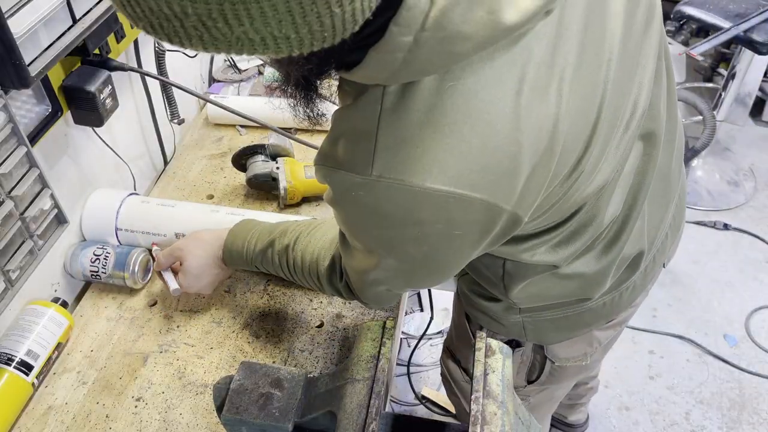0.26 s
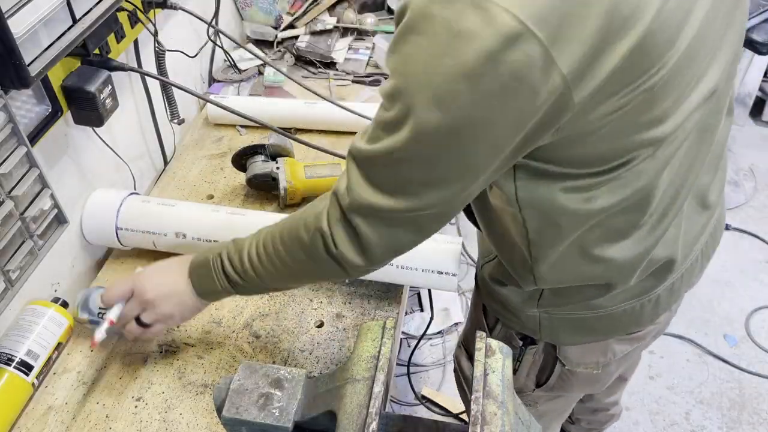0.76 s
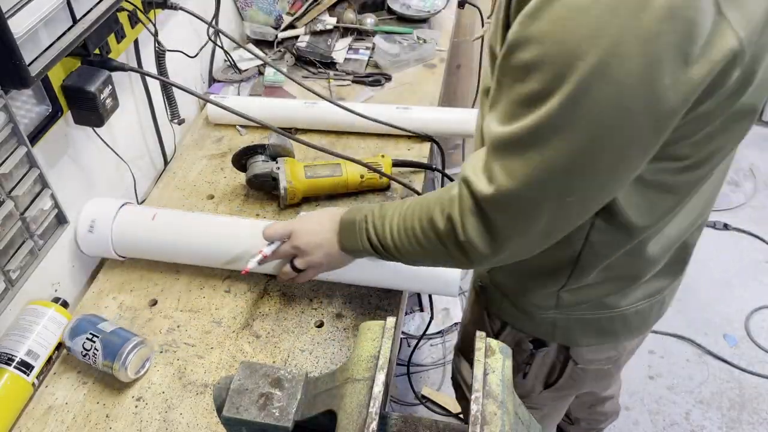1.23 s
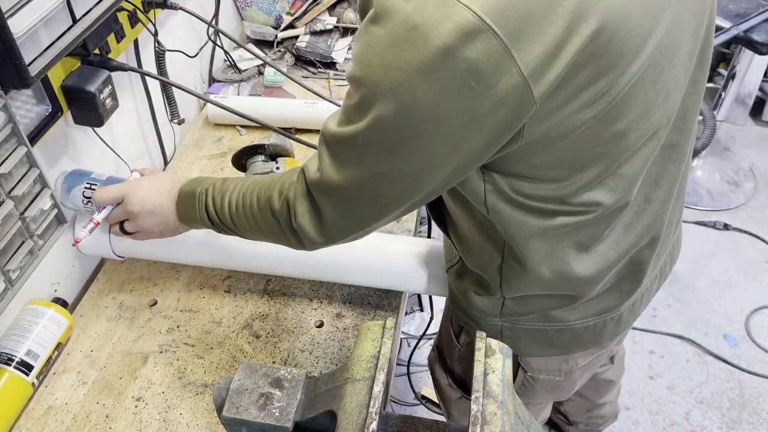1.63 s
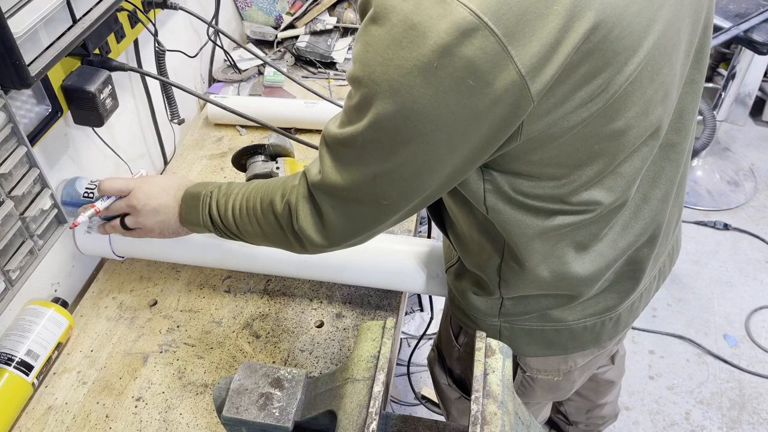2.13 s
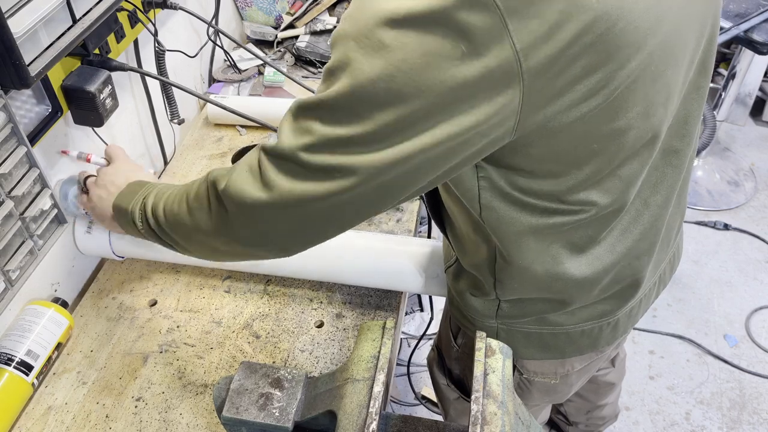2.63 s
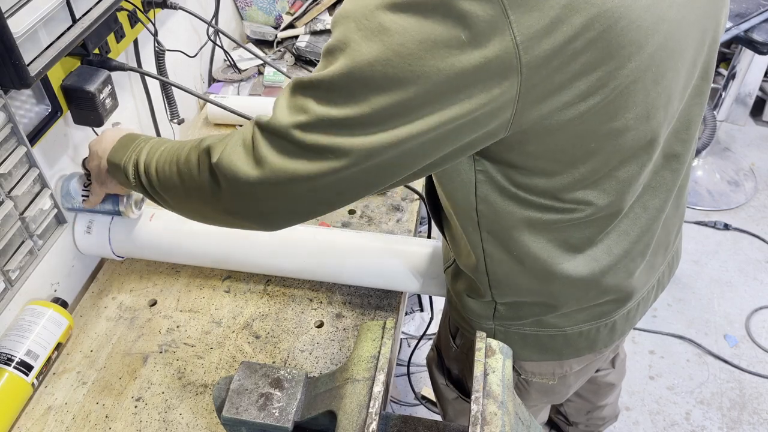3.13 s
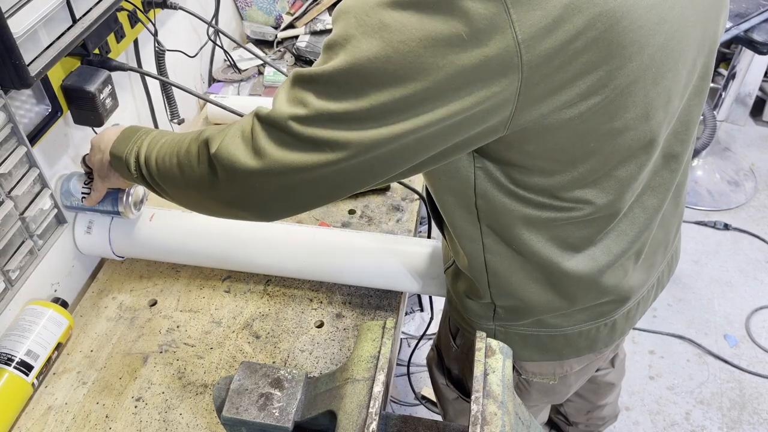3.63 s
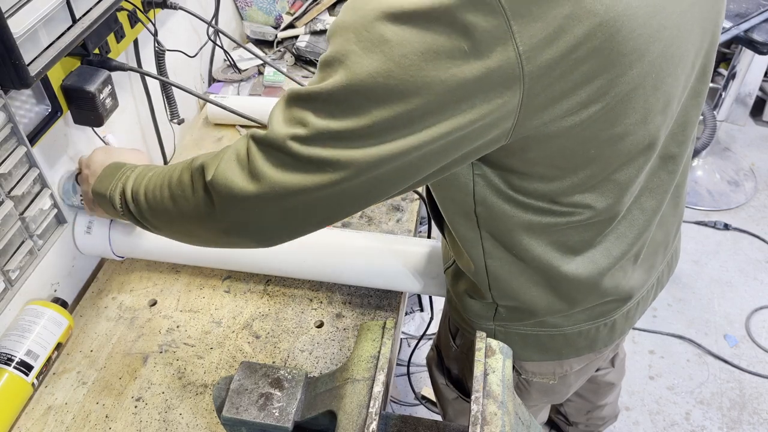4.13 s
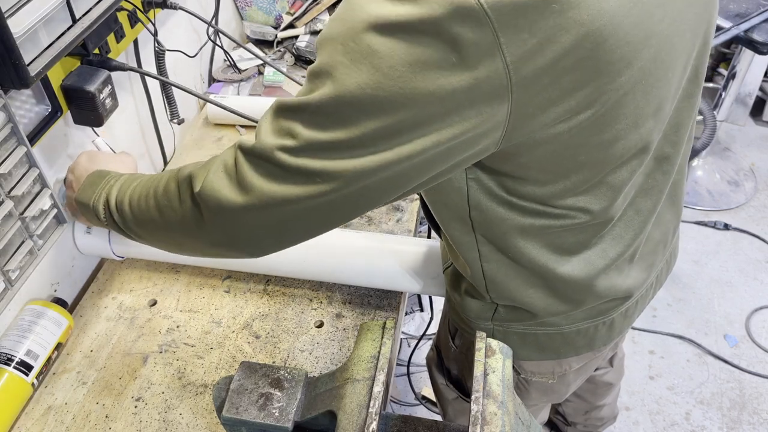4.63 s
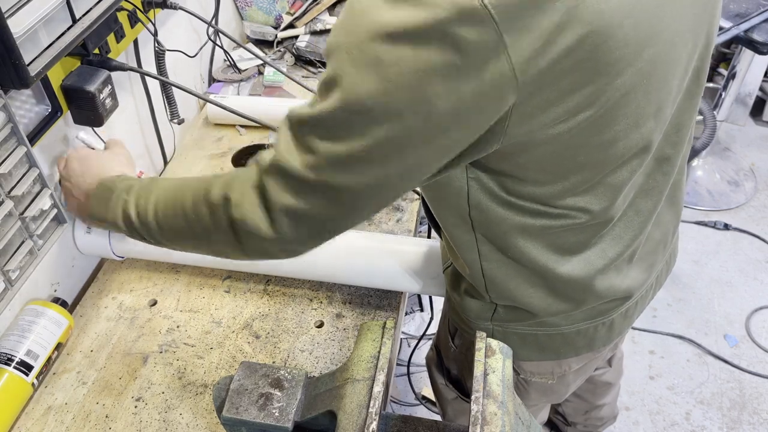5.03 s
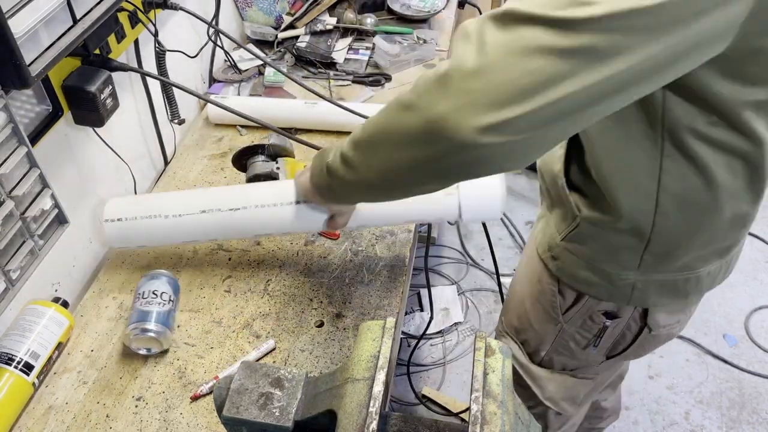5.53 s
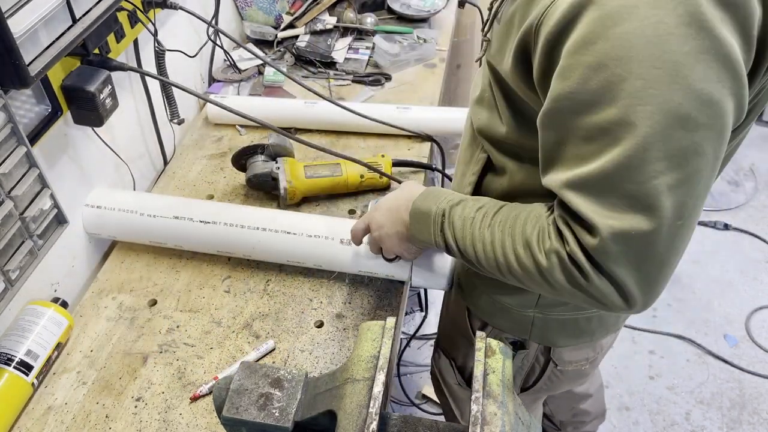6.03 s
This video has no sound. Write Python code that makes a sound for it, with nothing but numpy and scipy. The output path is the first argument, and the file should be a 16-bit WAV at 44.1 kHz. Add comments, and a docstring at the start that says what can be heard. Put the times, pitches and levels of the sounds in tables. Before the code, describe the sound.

A steady low mains hum in a dull rumble lies under the whole scene, in a small cluttered garage heard closely in stereo. From 0 to 0.7 s there are only faint hand scuffs and a light tick. At 0.8 s a drink can clacks sharply on the wooden bench; between 1.0 and 1.3 s a hollow plastic pipe bumps, rocks and slides with soft low thumps. From 1.5 to 3.1 s a marker and the can rub the pipe in short, uneven dry scrapes, with a firm knock at 1.6, a stronger squeaky rub around 2.2 and scratchy ticks. A crisp tick comes at 3.5 s, then sparse, weakening scuffs until 5. At 5.14 s a bright double can clack sets off ringing pipe chatter and skids. Dull landings follow at 5.6 s, small ticks after, and a low thump at 6.0 s, ending in faint rubbing.

```python
"""First a low mains hum in a dull rumble, with faint scuffs of a hand at work in a garage.
A plastic pipe and a drink can are shifted about on a wooden workbench: two sharp clacks of the can,
thumps, slides and chatter of the pipe, ticks and scuffs of a marker against it. Blows set off dying
sine waves; rubs are bursts of filtered noise in which single wall modes sometimes sing.
Noise echoes add a small cluttered room."""
import sys
import numpy as np
from scipy import signal
from scipy.fft import rfft, irfft, next_fast_len
from scipy.io import wavfile

SR = 44100
rng = np.random.default_rng(int(sys.argv[2]) if len(sys.argv) > 2 else 0)


def unload_wav(signal):
    """Save mono or channel-first audio to the path in sys.argv[1] as 16-bit WAV at rate SR, clipped to [-1, 1]."""
    wavfile.write(
        sys.argv[1],
        SR,
        np.round(np.clip(np.atleast_2d(signal).T, -1, 1) * 32767).astype(np.int16),
    )


N = 276066   # length in samples


def from_db(db):
    """Turns decibels into gain."""
    return 10 ** (np.asarray(db) / 20)


def at_hz(points, hz, axis=1):
    """Reads one column of a table on a log-frequency axis."""
    table = np.array(points)
    return np.interp(np.log(hz + 1e-9), np.log(table[:, 0]), table[:, axis])


def bins(size):
    """Frequencies in Hz of a real Fourier transform."""
    return np.arange(size // 2 + 1) * SR / size


def colour(x, *spectra):
    """Filters by the summed dB spectra, with no sound ahead of its cause (minimum phase)."""
    size = next_fast_len(x.shape[-1] + 2048, True) // 2 * 2
    total_db = sum(at_hz(spectrum, bins(size)) for spectrum in spectra)
    cepstrum = irfft(np.log(from_db(total_db)))
    # folding the cepstrum onto positive times gives the minimum phase
    cepstrum[1:size // 2] *= 2
    cepstrum[size // 2 + 1:] = 0
    response = np.exp(rfft(cepstrum))
    return irfft(rfft(x, size) * response)[..., :x.shape[-1]]


def lowpass(x, order, floor_db, top_hz):
    """Cuts steeply above top_hz, down to a floor."""
    return signal.sosfilt(signal.ellip(order, .2, floor_db, top_hz, fs=SR, output="sos"), x)


def add(track, s, sound):
    """Mixes a sound into a track at time s."""
    start = int(s * SR)
    part = track[..., start:start + sound.shape[-1]]
    part += sound[..., :part.shape[-1]]


def wobble(size, step_s, db):
    """A gain that glides to a new random value every step_s; rms 1."""
    targets = np.clip(rng.standard_normal(size), -2, 2)
    gain = from_db(db * np.interp(np.arange(size) / SR / step_s, np.arange(size), targets))
    return gain / np.sqrt(np.mean(gain ** 2))


def ring(modes, ratio=1, turn=1, longest_s=0.062):
    """A struck body's decaying sines, damped by the hand; negative turn flips every other mode."""
    t = np.arange(SR // 4) / SR
    body = np.zeros(len(t))
    for k, (hz, db, t60) in enumerate(modes):
        decay = from_db(db - 60 * t / min(t60, longest_s))
        body += turn ** k * decay * np.sin(2 * np.pi * hz * ratio * t)
    return body


def with_crack(body, crack_db, crack_s):
    """Adds the short noise of a hard contact to a ringing body."""
    fade = np.exp(-np.arange(len(body)) / SR / crack_s)
    return body + from_db(crack_db) * rng.standard_normal(len(body)) * fade


def shaped(grains, envelope):
    """Puts grains under an envelope, with the energy that the envelope gives."""
    burst = grains * envelope
    return burst * np.sqrt(np.mean(envelope ** 2) / (np.mean(burst ** 2) + 1e-20))


def swell(u, rise=0.48, fall=0.44):
    """A rub grows and fades with the speed of the hand; u runs from 0 to 1 over the rub."""
    return np.sqrt(2) * np.exp(-((u - .5) / np.where(u < .5, rise, fall)) ** 2)


RUB_TOP_HZ = 10620


def cut_top(x):
    """Cuts the rubs and rattles steeply above RUB_TOP_HZ."""
    return lowpass(x, 6, 50, RUB_TOP_HZ)


# The bass of a rub rises more slowly than its level.
BASS_REFERENCE_DB, BASS_LOSS_DB_PER_DB = -50, 0.5253


def with_bass(rows, bass_db):
    """Gives each rub its bass by its level; bass_db holds for a rub at BASS_REFERENCE_DB."""
    out = []
    for s, length, db, *tone in rows:
        bass = bass_db - BASS_LOSS_DB_PER_DB * (db - BASS_REFERENCE_DB)
        out.append((s, length, db, bass, *tone))
    return out


# The centres of bass, middle and treble. A plain list of frequencies in Hz.
TONE_CENTRES_HZ = [403, 1700, 6140]
SPOT_WIDTH_OCTAVES = 0.38   # half width of the broad resonance of the spot that is touched


def friction(rows, spectrum, envelope, rings, grain_db, grain_s, place_db):
    """Bursts of tiny catches and slips, each with its own tone, ringing in the things that touch."""
    force, t = np.zeros((2, N)), np.arange(-SR // 25, SR // 5) / SR
    mode_hz = np.linspace(200, 12000, 110)
    for s, length, db, bass_db, treble_db, spot_hz, spot_db in rows:
        grains = rng.standard_normal((2, len(t))) * wobble(len(t), grain_s, grain_db)
        burst = shaped(grains, envelope(t / length))
        tone = list(zip(TONE_CENTRES_HZ, [bass_db, 0, treble_db]))
        # each point of contact favours other modes
        place = list(zip(mode_hz, place_db * rng.uniform(-2.156, 1, len(mode_hz))))
        reach = 2 ** SPOT_WIDTH_OCTAVES
        spot = [(spot_hz / reach, 0), (spot_hz, spot_db), (spot_hz * reach, 0)]
        add(force, s + t[0], from_db(db) * colour(burst, spectrum, tone, place, spot))
    out = force.copy()
    for hz, width, db in rings:
        resonance = signal.iirpeak(hz, hz / width, fs=SR)
        out += from_db(db) * signal.lfilter(*resonance, force + 1e-18)
    return out


# The tone of the dull rumble. Each row: frequency in Hz, relative strength in dB per Hz.
RUMBLE_TONE = [(22, -4), (35, 0.5), (55, -2.5), (85, -1.5), (130, 4), (175, -4), (220, 3), (300, -15.5),
               (420, -10), (560, -20.5), (800, -35.5), (1500, -43), (2600, -48), (3500, -46.5), (5000, -51),
               (9000, -48), (10600, -53), (11800, -70.5)]
# How the background sinks briefly and comes back. Each row: time in seconds, gain in dB.
BACKGROUND_DIP = [(0, -1.5), (5.25, -1.5), (5.36, -6.5), (5.49, -4.5), (5.62, 1), (5.9, -2)]
HUM_HZ = 60
HUM_DB, RUMBLE_DB = -49.5, -54.5   # before the gain of the dip


def background(waver_db=1.0):
    """Mains hum, a slightly wavering sine, in a dull rumble of filtered noise."""
    t = np.arange(N) / SR
    rumble = colour(rng.standard_normal((2, N)), RUMBLE_TONE)
    waver = wobble(N, step_s=0.065, db=waver_db)
    hum = from_db(HUM_DB) * np.sqrt(2) * np.sin(2 * np.pi * HUM_HZ * t) * waver
    dip = from_db(np.interp(t, *np.transpose(BACKGROUND_DIP)))
    return (hum * [[1], [0]] + from_db(RUMBLE_DB) * rumble / rumble.std()) * dip


def reflections(x, t60, delay_s):
    """A dense cloud of echoes that builds up over delay_s and dies away; unit energy."""
    t = np.arange(SR // 2) / SR
    build = 1 - np.exp(-(t / delay_s) ** 2)
    echoes = rng.standard_normal((2, len(t))) * from_db(-60 * t / t60) * build
    echoes /= np.sqrt(np.sum(echoes ** 2, axis=1, keepdims=True))
    return signal.fftconvolve(x[None], echoes, axes=1)[:, :N]


# How firmly the fingers shift their grip between strokes.
# Each row: time in seconds, middle level of the faint scuffs in dB before the level of all strokes.
GRIP_SHIFTS = [(0, -71), (.25, -85), (.5, -100), (1.4, -68.5), (1.9, -69), (2.25, -60), (2.5, -67),
               (3.15, -65.5), (3.78, -71), (3.95, -88), (4.25, -73.5), (4.5, -88), (4.85, -82)]
FIDGET_STEP_S, FIDGET_S = .07, 0.031   # typical spacing and length
FIDGET_SPREAD_DB, FIDGET_BASS_DB, FIDGET_TREBLE_DB = 4, 5.5, 4
FIDGET_SPOT_HZ = 3340


def fidgets(count=68):
    """Lists faint scuffs of uneven spacing, length and strength while the hand works."""
    when, length, strength, tone = rng.uniform(-1, 1, (count, 4)).T
    s = FIDGET_STEP_S * (np.arange(count) + 1.3 + .7 * when)
    span = FIDGET_S * 2 ** (length / 2)
    db = np.interp(s, *np.transpose(GRIP_SHIFTS)) + FIDGET_SPREAD_DB * strength
    treble = FIDGET_TREBLE_DB + FIDGET_SPREAD_DB * tone
    return [(*row, FIDGET_SPOT_HZ, 0) for row in zip(s, span, db, np.full(count, FIDGET_BASS_DB), treble)]


# Marker and can rub along the pipe. Each row: start in seconds, length in seconds, level in dB before
# the level of all strokes, treble in dB over level, resonance of the spot in Hz, its lift in dB.
PIPE_STROKES = [(.09, 0.015, -74.5, 9.5, 3400, 9), (.155, 0.021, -72, 14, 3400, 8),
                (.19, 0.033, -79, 13, 3400, 8), (.26, 0.043, -79, 6, 3400, 3),
                (.335, 0.02, -81.5, 9, 3400, 5), (.64, .035, -60.5, 7.5, 3400, -3.5),
                (1.526, 0.012, -42, 9, 2200, -6), (1.607, 0.02, -57.5, 13, 10200, 15),
                (1.719, 0.032, -47.5, -1, 970, 11), (1.848, 0.03, -42, 5, 1180, 8),
                (1.893, 0.051, -43.5, 8.5, 1960, 11), (2.051, 0.064, -51.5, -8, 870, 12),
                (2.131, 0.017, -43.5, 11, 2100, 9.5), (2.226, 0.056, -35.5, 2, 1490, 4.5),
                (2.302, 0.02, -45.5, -1, 1300, -4), (2.413, 0.023, -68.5, 15, 3400, 9.5),
                (2.442, 0.03, -67, 18, 3400, 13.5), (2.476, 0.016, -66, 13, 3480, 24),
                (2.538, 0.023, -68, 22.5, 10500, 3.5), (2.658, 0.022, -49, 15.5, 3730, 9),
                (2.725, 0.049, -64.5, 5, 3400, 8.5), (2.828, 0.035, -64, 3.5, 3400, 11),
                (2.885, 0.033, -72, 15.5, 3400, 5), (2.977, 0.02, -58, 7.5, 3400, 12),
                (3.022, 0.017, -36, 3.5, 1370, -4), (3.118, 0.033, -53.5, 9.5, 3400, 5),
                (3.165, 0.018, -49.5, 9.5, 1300, 1), (3.33, 0.03, -63.5, -4, 3400, 11),
                (3.588, 0.015, -71, 15, 3000, 5), (3.674, 0.035, -51, 9, 1100, 13),
                (3.732, 0.024, -58.5, 13.5, 2220, 12), (3.794, 0.015, -60, 11.5, 3620, 15),
                (3.858, 0.02, -44, 11, 3590, 0), (4.125, 0.039, -47.5, -0.5, 1100, 5),
                (4.238, 0.019, -65.5, 1, 3400, 2), (4.385, 0.034, -72.5, 4, 3400, 2),
                (4.64, 0.015, -69, -2, 1200, 3.5), (4.677, 0.018, -65, 13.5, 3400, -5),
                (4.785, .022, -60.5, 0, 3680, 9), (5.047, 0.04, -59.5, 8, 10000, 0.5)]
STROKE_BASS_DB = 12   # at BASS_REFERENCE_DB


def hand_strokes():
    """Lists the rubs along the pipe and the faint scuffs of the fingers."""
    return with_bass(PIPE_STROKES, STROKE_BASS_DB) + fidgets()


# What friction excites in pipe and bench. Each row: frequency in Hz, strength in dB per Hz.
FRICTION_TONE = [(100, -17), (250, 10), (500, 1.5), (1000, 4), (2100, -2.5), (2700, -9.5), (3500, -8.5),
                 (6400, -10), (7800, -11), (8800, -4), (10600, -3.5), (11200, -26), (12000, -37)]
# Resonances of the marker on the pipe. Each row: frequency in Hz, width in Hz, level in dB.
MARKER_RESONANCES = [(843, 270, -9), (1620, 83, 4.5), (2100, 55, 0.5), (3370, 410, 6.5), (4300, 87, -11)]


def strokes_on_pipe(strokes, level_db=-7.0):
    """Marker, can and fingers rub on the plastic: friction noise that rings in the marker."""
    rubs = friction(strokes, FRICTION_TONE, swell, MARKER_RESONANCES, grain_db=4.3, grain_s=.003, place_db=7)
    return cut_top(from_db(level_db) * rubs)


SCRATCH_HZ, SCRATCH_WIDTH_HZ, SCRATCH_SHIFT_OCTAVES = 3340, 700, 0.046   # band of the tip's hiss
SLIPS_PER_S, SLIP_S = 260, 0.0011   # the tip catches and lets go; SLIP_S is a slip's decay time constant


def scratching(strokes, level_db=-38, pressure=0.67, glide_db=-12):
    """The marker tip hisses in uneven slips; its band shifts by stroke, its level rises less than the rub's."""
    out, t = np.zeros((2, N)), np.arange(-SR // 25, SR // 5) / SR
    for s, length, db, *tone in strokes:
        hz = SCRATCH_HZ * 2 ** (SCRATCH_SHIFT_OCTAVES * rng.uniform(-1, 1))
        edges = [hz - SCRATCH_WIDTH_HZ / 2, hz + SCRATCH_WIDTH_HZ / 2]
        band = signal.butter(2, edges, "band", fs=SR, output="sos")
        slips = (rng.random(len(t)) < SLIPS_PER_S / SR) * rng.exponential(1, len(t))
        grip = from_db(glide_db) + signal.lfilter([1], [1, -np.exp(-1 / (SLIP_S * SR))], slips)
        scratch = signal.sosfilt(band, grip * rng.standard_normal((2, len(t))))
        add(out, s + t[0], from_db(level_db + pressure * db) * shaped(scratch, swell(t / length)))
    return out


# Small hard touches. Each row: start in seconds, level in dB before the level of all ticks,
# treble in dB over level, resonance of the spot in Hz, its lift in dB.
TOUCHES = [(0.622, -40.5, 10.5, 10000, -2), (1, -43, 11.5, 4970, -1), (1.143, -53, 11, 9200, -2.5),
           (1.15, -42.5, 24.5, 9900, -3), (1.5004, -44, 22, 6030, 1), (1.6162, -24.5, -10, 890, 7.5),
           (2.063, -57.5, 24, 4440, 5), (2.572, -53.5, 13, 3400, 6), (3.021, -38, 4, 380, 10),
           (3.232, -51.5, 3.5, 6000, -2), (3.4802, -31, 9.5, 3300, 7), (3.4845, -42, 9, 2500, 9),
           (3.871, -50, 10, 3600, 9), (4.192, -49, 11, 3480, 8), (5.6683, -32, 5.5, 2500, 1),
           (5.676, -37, -4, 10000, -1), (5.867, -37.5, 10.5, 2000, 13)]
# What a small hard touch excites. Each row: frequency in Hz, strength in dB per Hz.
TAP_TONE = [(100, -18), (250, 1), (500, -2.5), (1000, 2), (2100, -5.5), (3500, -12), (6400, -10),
            (8800, -7), (10800, -9), (12000, -27)]
TICK_T60_S, TICK_BASS_DB = 0.021, -2.5


def sudden(u):
    """Starts at once and falls by 60 dB while u runs from 0 to 1."""
    return (u >= 0) * np.exp(-np.log(1000) * np.abs(u))


def ticks(level_db=3):
    """A touch starts at once and dies quickly in one broad, damped resonance."""
    touches = [(s, TICK_T60_S, db, TICK_BASS_DB, *tone) for s, db, *tone in TOUCHES]
    broad = [(3593, 1900, 0.0)]   # Hz, width Hz, dB
    return from_db(level_db) * friction(touches, TAP_TONE, sudden, broad,
                                        grain_db=8.5, grain_s=0.00059, place_db=6.5)


# A catch sets one wall mode singing. Each row: start in seconds, frequency in Hz,
# level in dB before build-up and grip, time to fall by 60 dB in seconds (at most 0.2 is used).
SINGING_MODES = [(1.215, 1226, -37, 0.098), (1.23, 1960, -44, 0.11), (2.236, 2102, -28, 0.064),
                 (5.167, 2068, -28.5, 0.067), (5.170, 4520, -30, 0.078), (5.2, 933, -31, 0.27),
                 (5.168, 3400, -38.5, .08), (5.527, 2100, -36, 0.043), (6.025, 2163, -44.5, 0.049),
                 (6.174, 2135, -43, 0.071)]
SINGING_WANDER_HZ = 30.23   # scales how far the shifting grip pulls a singing mode about


def singing(build_s=0.0039):
    """Single modes build up under the rub and ring on unevenly while the hand damps them."""
    out, t = np.zeros(N), np.arange(SR // 3) / SR
    build = 1 - np.exp(-t / build_s)
    for s, hz, db, t60 in SINGING_MODES:
        grip = wobble(len(t), step_s=.008, db=4)
        wander_hz = SINGING_WANDER_HZ * (wobble(len(t), step_s=.003, db=4) - 1)
        phase = 2 * np.pi * np.cumsum(hz + wander_hz) / SR
        decay = from_db(db - 60 * t / min(t60, .2))
        add(out, s, decay * grip * build * np.sin(phase))
    return out * [[1], [0]]


# The pipe lands on the bench. Each row: start in seconds, strength in dB,
# contact cut-off in Hz (higher is harder), share of the bench in dB.
LANDINGS = [(1.047, -32.5, 820, -6), (1.076, -22.5, 1001, -4.5), (1.196, -26.5, 280, -11),
            (1.271, -27, 260, -2), (1.2818, -20.5, 330, 3), (3.878, -44, 705, -11),
            (5.143, -30.5, 299.4, -6.5), (5.2141, -31.5, 900, -22), (5.5992, -19.5, 370, -3),
            (5.649, -23, 330, 4), (5.669, -27, 438, -3), (5.876, -40, 800, -6), (6.004, -18, 230, -9.5)]
SKID_S, SKID_DB, SKID_DB_PER_OCTAVE = .025, -18, 10   # the harder the contact, the louder the skid
SKID_CONTACT_HZ = 400   # contact at which a skid has just SKID_DB
SKID_BASS_DB, SKID_TREBLE_DB = 10.5, -6.5


def skids():
    """Lists the short rub around each landing of the pipe."""
    rows = []
    for s, db, contact_hz, bench_db in LANDINGS:
        level = db + SKID_DB + SKID_DB_PER_OCTAVE * np.log2(contact_hz / SKID_CONTACT_HZ)
        rows.append((s - SKID_S / 2, SKID_S, level, SKID_BASS_DB, SKID_TREBLE_DB, contact_hz, 0))
    return rows


# The pipe slides on the bench. Each row: start in seconds, length in seconds, level in dB,
# treble in dB over level, resonance of the spot in Hz, its lift in dB.
PIPE_SLIDES = [(.737, 0.03, -52, 6.5, 3300, 5), (.772, 0.029, -45.5, 14.5, 3300, 6),
               (.82, 0.022, -34, 1, 3160, 5), (.85, .04, -62.5, 9.5, 1100, -2),
               (.94, 0.0095, -61.5, 12, 1800, -2), (1.005, 0.045, -42, -3, 3350, -1),
               (1.071, 0.026, -44, 4, 750, 5), (1.141, 0.028, -43.5, 8.5, 10000, 0),
               (1.185, 0.05, -41.5, -5, 800, 8), (1.207, 0.059, -41.5, -3, 1200, 1),
               (1.258, 0.03, -38.5, -0.5, 2100, 2), (1.29, 0.032, -56.5, -19, 1110, 5),
               (5.119, 0.018, -45.5, 11, 3400, 6), (5.158, 0.031, -35, -0.5, 3500, 12),
               (5.184, 0.028, -27.5, 3.5, 3200, 5), (5.211, 0.026, -28.5, -7.5, 476, 2),
               (5.228, 0.037, -33.5, -8, 1100, 3), (5.293, 0.06, -40, -5, 1320, 6.5),
               (5.52, 0.048, -45, 2, 1380, 1.5), (5.595, 0.026, -46.5, 3.5, 10000, 4.5),
               (5.636, .025, -45.5, -21, 930, 9.5), (5.665, 0.057, -50.5, -8, 1300, -2),
               (5.736, 0.015, -47.5, 4, 3400, 2.5), (5.853, 0.028, -47, 10.5, 9850, 3),
               (5.885, 0.045, -51, -3, 2100, 6), (6.024, 0.01, -47.5, -10, 800, 14),
               (6.06, 0.094, -68, -1, 700, 10), (6.15, 0.037, -53.5, -1, 763, 11.5)]
# Resonances of the pipe wall. Each row: frequency in Hz, width in Hz, level in dB.
WALL_RESONANCES = [(480, 78, -4.5), (1005, 70, -1), (1380, 50, -4.5), (1622, 140, -6.5), (2080, 74, 1.5),
                   (2900, 140, -8), (3400, 160, -3), (4480, 57, -10.5), (6150, 79, -4.5)]
SLIDE_BASS_DB = 10   # at BASS_REFERENCE_DB


def slides_on_bench():
    """The pipe slides and skids over the wood: friction noise that rings in its hollow wall."""
    rows = with_bass(PIPE_SLIDES, SLIDE_BASS_DB) + skids()
    return cut_top(friction(rows, FRICTION_TONE, swell, WALL_RESONANCES, grain_db=4.5, grain_s=.002, place_db=6.5))


# The pipe chatters against the bench as it is handled. Each row: start in seconds, strength in dB.
CHATTER = [(1.221, -48), (1.232, -52), (1.247, -51), (2.24, -47.5), (2.254, -55), (5.15, -34), (5.186, -32),
           (5.1909, -31.5), (5.2055, -35), (5.2143, -28), (5.221, -33), (5.227, -34), (6.027, -62),
           (6.124, -67.5), (6.165, -61)]


def rattles(spread_db=4.5, detune=0.061, longest_s=0.051, crack_db=-2, crack_s=0.0014):
    """Each hard contact strikes the hollow wall modes anew, and the grip detunes them."""
    out = np.zeros(N)
    for s, db in CHATTER:
        chance = rng.uniform(-1, 1, (len(WALL_RESONANCES), 2))
        modes = []
        for (hz, width, level), (shift, strength) in zip(WALL_RESONANCES, chance):
            t60 = np.log(1000) / (np.pi * width)   # a narrow resonance rings longer
            modes.append((hz * (1 + detune * shift), level + spread_db * strength, t60))
        body = ring(modes, turn=-1.004, longest_s=longest_s)
        add(out, s, from_db(db) * with_crack(body, crack_db, crack_s))
    return cut_top(out * [[1], [0]])


# The pipe rocks to and fro. Each row: start in seconds, strength of the first bump in dB.
ROCKING = [(1.016, -28.5), (1.123, -40.5), (1.232, -35.5), (5.711, -40)]
ROCK_STEP_S, ROCK_CHANGE_DB = 0.025, -0.5   # from one bump to the next
ROCK_CONTACT_HZ, ROCK_BENCH_DB = 238.4, 1.5
GRAZE_LEAD_S, GRAZE_DB = .0105, -17.5


def pipe_contacts(count=3):
    """Lists landings, the graze before each, and rocking as short runs of slowly weakening bumps."""
    grazes = [(s - GRAZE_LEAD_S, db + GRAZE_DB, contact_hz, bench_db) for s, db, contact_hz, bench_db in LANDINGS]
    bumps = [(s + k * ROCK_STEP_S, db + k * ROCK_CHANGE_DB, ROCK_CONTACT_HZ, ROCK_BENCH_DB)
             for s, db in ROCKING for k in range(count)]
    return list(LANDINGS) + grazes + bumps


# Modes of the bench top and of the pipe. Each row: frequency in Hz, level in dB,
# time to fall by 60 dB in seconds (the hand allows at most 0.062).
BENCH_MODES = [(86, -12, 0.11), (123.5, 4, 0.076), (142, -2, 0.1)]
PIPE_MODES = [(201, -4.5, 0.17), (241, 1.5, 0.062), (334, 1.5, 0.024), (474, -9, 0.037), (598, -1, 0.037),
              (842, -5, 0.07), (1250, -7.5, 0.15), (1946, -9, 0.09)]


def thumps(pipe_low_hz=150, bench_low_hz=60):
    """Soft contacts make pipe and bench top answer in their modes; neither radiates deep bass."""
    pipe = signal.sosfilt(signal.butter(3, pipe_low_hz, "high", fs=SR, output="sos"), ring(PIPE_MODES))
    bench = signal.sosfilt(signal.butter(2, bench_low_hz, "high", fs=SR, output="sos"), ring(BENCH_MODES))
    out = np.zeros(N)
    for s, db, contact_hz, bench_db in pipe_contacts():
        contact = signal.butter(2, contact_hz, fs=SR, output="sos")
        add(out, s, from_db(db) * signal.sosfilt(contact, pipe + from_db(bench_db) * bench))
    return out


# The can hits the bench and bounces. Each row: start in seconds, strength in dB, pitch ratio,
# part that is struck.
CAN_HITS = [(0.805, -5, 1, "side"), (0.8115, -22.5, 1.6, "side"), (5.141, -8.5, 1.02, "rim"),
            (5.1435, -4, 0.98, "rim")]
# Modes of the can on its side, and on its stiff rim with a thin ping. Each row: frequency in Hz
# before the pitch ratio, level in dB, time to fall by 60 dB in seconds (at most 0.04 is used).
CAN_SIDE_MODES = [(370.4, -21.5, 0.039), (640, -23, .03), (797, -15, 0.041), (953, -5.5, 0.022),
                  (1260, -11.5, .032), (1539, -20, .03), (1700, -17.5, 0.036), (2015, -19, 0.05),
                  (2420, -23, .02), (2970, -25, .03), (3283, -27, 0.04), (3610, -24.5, 0.019),
                  (5183, -26.5, 0.028), (6280, -28, 0.025), (8250, -19, .03), (8930, -14.5, 0.014),
                  (10780, -20, .022)]
CAN_RIM_MODES = [(903, -14.5, 0.023), (1380, -18, 0.023), (1660, -24, 0.052), (1990, -16.5, .03),
                 (2470, -21, 0.021), (2980, -22.5, .022), (3434, -26.5, 0.021), (4400, -31.5, 0.023),
                 (5200, -27.5, .03), (6300, -22, 0.043), (7470, -27, .025), (8380, -21.5, .025),
                 (9180, -13, 0.021), (9170, -5.5, 0.025), (9610, -7, 0.018), (10330, -12, 0.0078),
                 (10550, -19.5, 0.0047)]


def clacks(scatter_db=-5, crack_db=-23, crack_s=0.0029):
    """A hard knock of the can with a crack, scattered at once by the clutter and the wall."""
    out = np.zeros(N)
    for s, db, ratio, part in CAN_HITS:
        modes = CAN_SIDE_MODES if part == "side" else CAN_RIM_MODES
        body = ring(modes, ratio, turn=-1, longest_s=.04)
        add(out, s, from_db(db) * with_crack(body, crack_db, crack_s))
    return out * [[1], [0]] + from_db(scatter_db) * reflections(out, t60=0.033, delay_s=0.00016)


# How the left and right channels differ. Each row: frequency in Hz, likeness from 0 to 1,
# phase lead of the left in radians, left over right in dB.
LEFT_RIGHT = [(150, .997, 0, 0), (330, .93, .15, 0), (500, .7, .45, -1), (850, .75, 1.1, .5),
              (1500, .6, 1.2, -.5), (2200, .7, .9, -1.5), (3200, .35, -.2, -5.5), (5200, .45, -2.2, -6.5),
              (7500, .45, -1.9, -2.5), (9300, .35, -.3, 0)]


def ports(pair):
    """Spreads a shared and a diffuse signal over two channels that grow unlike towards the treble."""
    size = next_fast_len(N, True)
    shared, diffuse = rfft(pair, size)
    hz, sides = bins(size), np.array([[1], [-1]])
    alike = np.clip(at_hz(LEFT_RIGHT, hz), 0, 1)
    level = from_db(sides * at_hz(LEFT_RIGHT, hz, axis=3) / 2)
    phase = np.exp(.5j * sides * at_hz(LEFT_RIGHT, hz, axis=2))
    blend = np.sqrt((1 + alike) / 2) * shared + sides * np.sqrt((1 - alike) / 2) * diffuse
    return irfft(level * phase * blend, size)[:, :N]


ROOM_T60_S = 0.23
ROOM_TOP_HZ = 9700   # the echoes are cut steeply above this


def scene(room_db=-16, tick_room_db=-23, clack_room_db=-21, thump_room_db=-17):
    """Everything on the bench, close by, in a small cluttered room."""
    hand = hand_strokes()
    rubs = slides_on_bench() + strokes_on_pipe(hand) + singing() + scratching(hand)
    taps = ticks()
    knocks = clacks() + rattles()
    dull = thumps()
    # the first row of each pair is the shared signal, which feeds the room
    send = from_db(room_db) * rubs[0] + from_db(tick_room_db) * taps[0]
    send += from_db(clack_room_db) * knocks[0] + from_db(thump_room_db) * dull
    room = reflections(lowpass(send, 6, 50, ROOM_TOP_HZ), t60=ROOM_T60_S, delay_s=0.0016)
    return ports(rubs + taps + knocks + dull * [[1], [0]] + room + background())


CUTOFF_HZ = 12400


def record(dry):
    """Cuts the top steeply."""
    return lowpass(dry, 10, 90, CUTOFF_HZ)


dry = scene()
out = record(dry)
unload_wav(out)
```